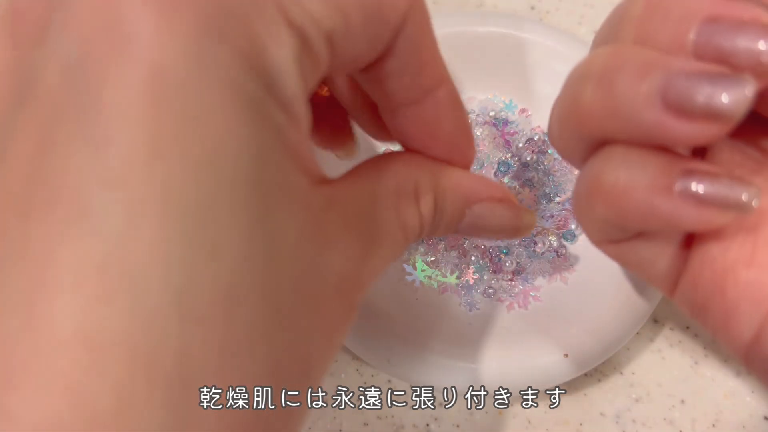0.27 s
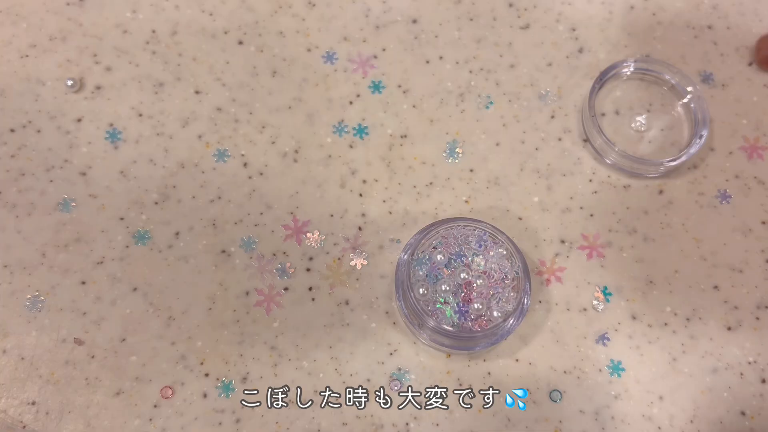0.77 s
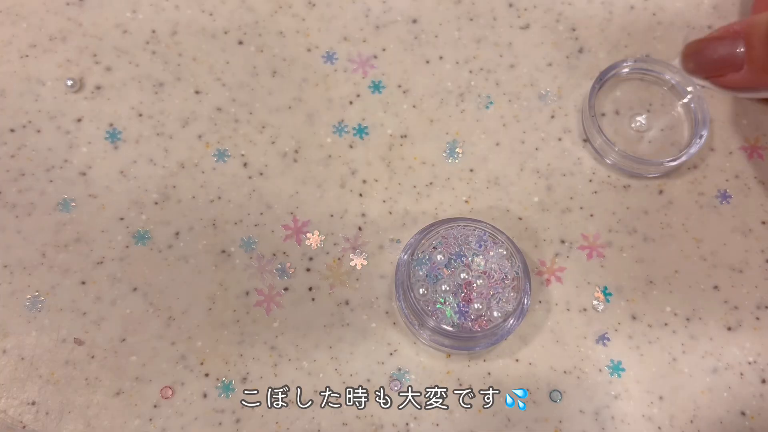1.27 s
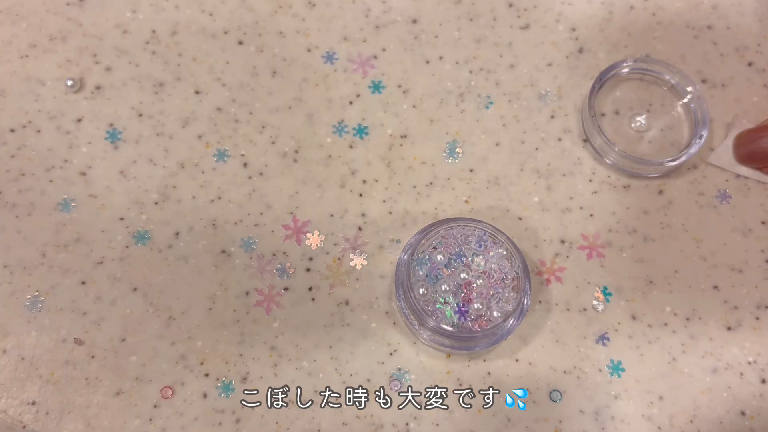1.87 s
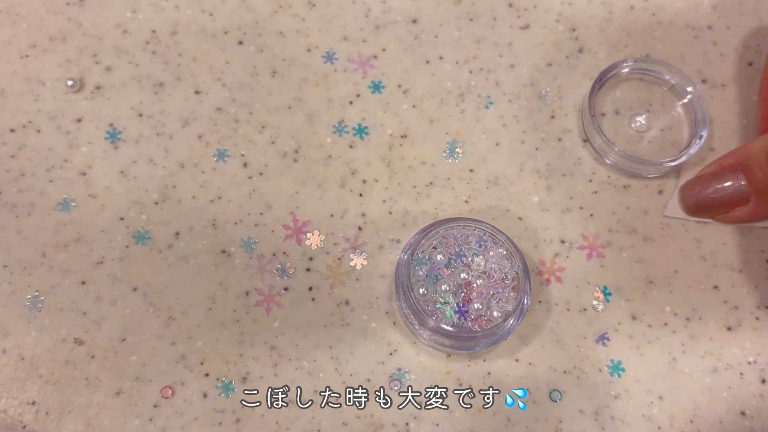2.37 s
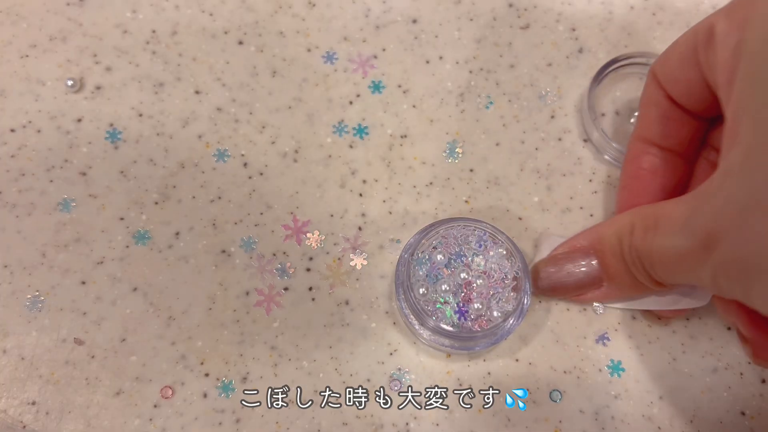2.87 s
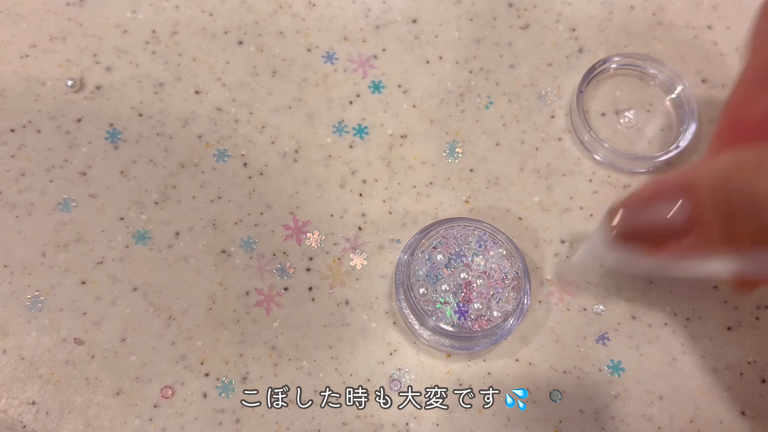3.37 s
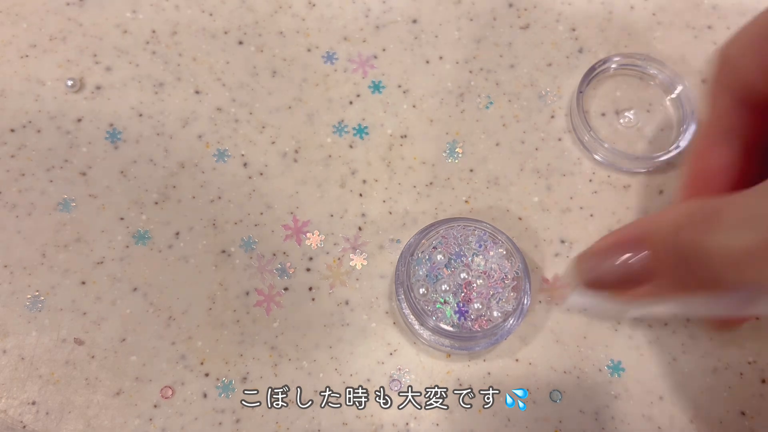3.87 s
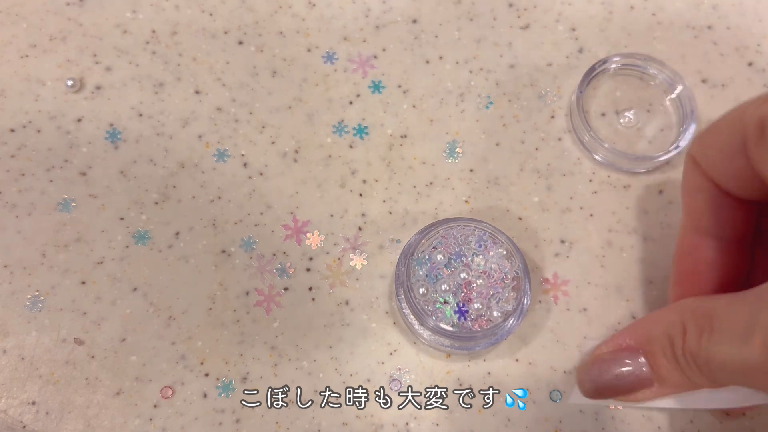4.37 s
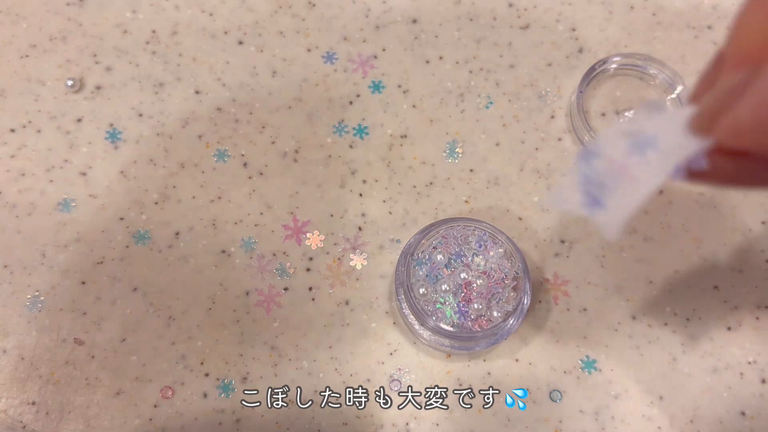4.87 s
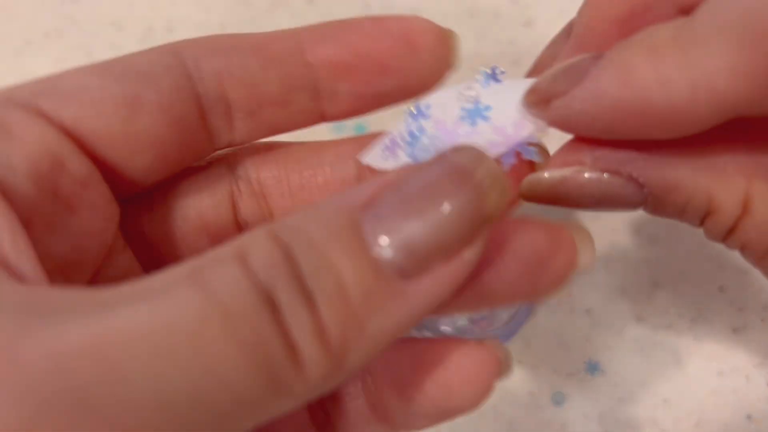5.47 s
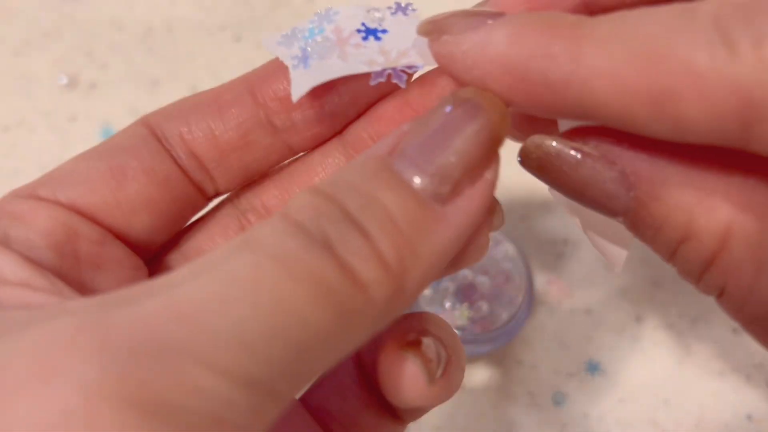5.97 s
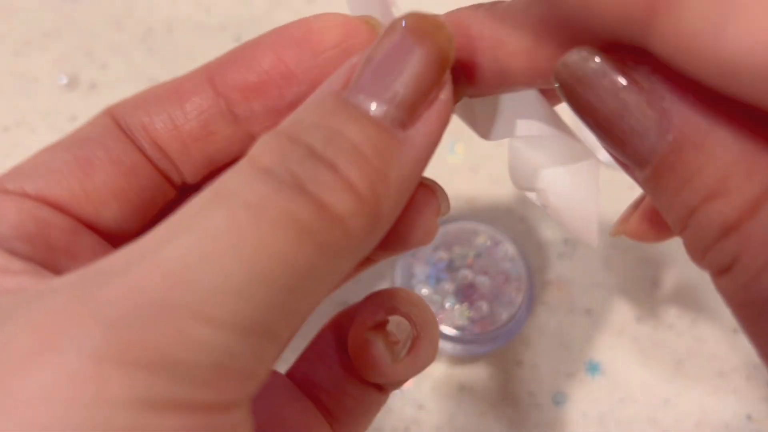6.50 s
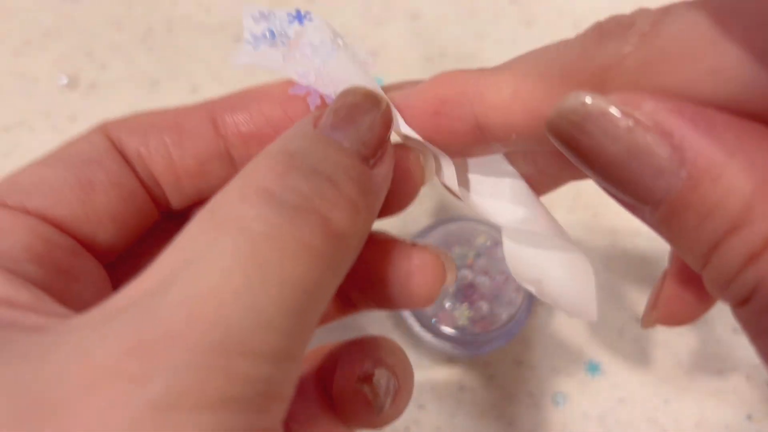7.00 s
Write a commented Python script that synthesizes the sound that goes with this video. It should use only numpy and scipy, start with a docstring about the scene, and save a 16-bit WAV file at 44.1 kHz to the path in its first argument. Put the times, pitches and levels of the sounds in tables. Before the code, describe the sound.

A quiet, dry indoor space with a soft low fan hum and faint room air throughout, picked up by a very close stereo microphone. Light skin and tape rustle opens; at 0.6 s a soft deep thump with bright ticks, then a strong crisp crackle at 0.8 s. Fingertip thumps with light knocks and sticky snaps follow at about 1.2, 1.75, 1.95 and 2.3 s, with small crackles at 1.5, 2.4 and 2.6 s. Another snap comes at 3.1 s, and the sharpest, brightest click with a knock at 3.6 s. Clicks at 3.85 and 4.4 s surround a soft thump near 4.2 s; short faint scrapes run from 4.45 to 4.7 s. Then it thins out: tiny ticks, a light tap at 5.6 s, crisp peeling snaps at 6.35 and 6.55 s, and a bright snap at 6.9 s over faint rustling.

```python
"""Fingers press a scrap of sticky tape on a hard counter to pick up spilled plastic sequins, then peel at it.
Tape and sequins snap in bursts of micro-slips and rustle as dense tiny slips through the tape's resonances.
Fingertips thump and nails knock the counter, ringing its modes; edges scrape along it.
A fan hums through duct resonances in quiet room air, all heard by two close microphone ports
a fraction of a millisecond apart."""
import sys
import numpy as np
from scipy import signal
from scipy.fft import rfft, irfft, next_fast_len
from scipy.io import wavfile
from scipy.ndimage import uniform_filter1d

SR = 44100
rng = np.random.default_rng(int(sys.argv[2]) if len(sys.argv) > 2 else 0)


def put_to_file(sound):
    """Save the sound as 16-bit audio at rate SR, in the file named by the first command-line argument."""
    columns = np.atleast_2d(sound).T  # one column per channel
    safe = np.clip(columns, -1, 1)
    whole_steps = np.round(safe * 32767)
    wavfile.write(sys.argv[1], SR, whole_steps.astype(np.int16))


N = 319284   # length in samples


def amp(db):
    """Turn dB into gain."""
    return 10 ** (np.asarray(db) / 20)


def rms_one(x):
    """Scale a sound to rms 1."""
    return x / np.sqrt(np.mean(x ** 2) + 1e-20)


def at_hz(points, hz):
    """Read a spectrum table on a log-frequency axis."""
    point_hz, values = np.array(points).T
    return np.interp(np.log(hz + 1), np.log(point_hz + 1), values)


def band(x, low_hz, high_hz, order=2):
    """Causal band-pass."""
    edges = [low_hz, min(high_hz, .45 * SR)]
    return signal.sosfilt(signal.butter(order, edges, "band", fs=SR, output="sos"), x)


def resonate(x, hz, width_hz):
    """Two-pole resonance; a narrower one rings longer."""
    r = np.exp(-np.pi * width_hz / SR)
    return signal.lfilter([1, 0, -1], [1, -2 * r * np.cos(2 * np.pi * hz / SR), r * r], x)


def ports(x):
    """One sound as both ports hear it: phase and level differ between them, less so for long waves."""
    # Difference between the ports. Each row: frequency in Hz, left port's phase lead in radians,
    # left minus right in dB; both differences shrink below 250 Hz.
    port_difference = [(0, -0.5, -1.5), (423, 0.86, 1.2), (860, -1.5, -2), (1400, -0.5, 1.5),
                       (2250, 1.1, 0), (2600, 2.4, -1.5), (3700, 1.4, -1.5), (5090, 1.6, -2),
                       (6120, 3.5, -0.5), (8135, 6.5, 0.5), (17730, 19.5, -0.5)]
    at, lead, tilt_db = np.transpose(port_difference)
    size = next_fast_len(N + 64)
    hz = np.arange(size // 2 + 1) * SR / size
    apart = np.clip(hz / 250, 0, 1)
    half_phase = .5 * apart * np.interp(hz, at, lead)
    half_gain = amp(.5 * apart * np.interp(hz, at, tilt_db))
    turn = np.exp(1j * half_phase) * half_gain
    spectrum = rfft(x, size)
    left = irfft(spectrum * turn, size)[:N]
    right = irfft(spectrum / turn, size)[:N]
    return np.array([left, right])


def hum():
    """The fan drives a few narrow duct resonances, steadier than free noise, and a thin hiss high up."""
    # Fan resonances. Each row: frequency in Hz, nominal width in Hz, rms level in dB.
    ducts = [(167.7, 10.6, -53), (186, 10.3, -63.5), (226.4, 31, -72.5), (287.6, 15, -68), (718, 19, -82.5),
             (6890, 330, -80.5)]
    steadiness = .25   # 0 free noise, 1 constant height
    rotor_hz, rotor_db = 28.7, -65.5   # the fan's turning, a steady low tone; rms level
    lead_in = 8192   # samples dropped while the resonances build up
    out = 0
    white = rng.standard_normal((len(ducts), next_fast_len(N + lead_in)))
    for noise, (hz, width_hz, level_db) in zip(white, ducts):
        stage_width_hz = width_hz * 1.36   # two passes narrow the resonance
        tone = resonate(resonate(noise, hz, stage_width_hz), hz, stage_width_hz)
        height = np.abs(signal.hilbert(tone)) + 1e-9
        evened = tone / height ** steadiness
        out = out + amp(level_db) * rms_one(evened[lead_in:lead_in + N])
    rotor = np.sqrt(2) * np.sin(2 * np.pi * rotor_hz * np.arange(N) / SR)
    return out + amp(rotor_db) * rotor


def room_air():
    """Steady room noise: a part both ports share and a part each has alone."""
    # Colour of the room air. Each row: frequency in Hz, relative density in dB per Hz.
    air_colour = [(15, -35.5), (28, -17.5), (40, -14.5), (75, -5), (120, -13.5), (200, -17), (345, -23),
                  (485, -21), (642, -31.5), (1080, -29), (1900, -40.5), (3400, -44.5), (5500, -56.5),
                  (9000, -74.5), (14000, -58.5), (16000, -94.5)]
    # Likeness of the room air at the two ports. Each row: frequency in Hz, shared share of power (0 to 1).
    likeness = [(15, .999), (110, 0.99), (170, 0.88), (350, .8), (700, 0.067), (1800, 0.61), (2800, 0.06),
                (4800, .2), (6000, 1), (17000, 1)]
    air_db = -56.5   # rms
    hz = np.arange(N // 2 + 1) * SR / N
    colour = amp(at_hz(air_colour, hz))
    alike = np.clip(at_hz(likeness, hz), 0, 1)
    white = rfft(rng.standard_normal((3, N)))
    shared = ports(irfft(white[0] * colour * np.sqrt(alike), N))
    alone = irfft(white[1:] * colour * np.sqrt(1 - alike), N)
    return amp(air_db) * rms_one(shared + alone)


def rubbing(hz):
    """Strength of all rubbing near one pitch: the fidgeting plus every rub, each swelling and fading."""
    # Uneven fidgeting of skin and sleeve beneath the rubs. Each row: time in seconds, level at 7500 Hz in dB.
    fidgeting = [(0.0, -69), (0.15, -84.5), (0.43, -83.5), (1.12, -72.5), (1.4, -82), (2.0, -77.5),
                 (2.175, -101), (2.35, -92), (2.85, -78), (3.0, -90), (3.467, -104), (3.68, -89),
                 (4.08, -102), (4.2, -70), (4.335, -83), (4.79, -77), (4.95, -79.5), (5.07, -74),
                 (5.54, -73.5), (5.68, -87), (6.15, -78.5), (6.21, -103), (6.43, -75), (6.75, -82.5),
                 (7.11, -71), (7.24, -77.5)]
    # Rubs of tape on skin and counter. Each row: peak in seconds, peak level at 7500 Hz in dB,
    # ms to swell 10 dB, ms to fade 10 dB, tilt in dB per octave.
    rubs = [(0.2, -72.5, 13, 39, 23.5), (0.644, -66.5, 22, 65, -1), (0.821, -42.5, 14, 10.5, 7),
            (0.85, -68.5, 63, 49, -3), (1.18, -66.5, 22, 50, -3.5), (1.332, -66, 40, 21, 2.5),
            (1.522, -59, 67, 28, 0), (1.656, -68, 39, 51, 1), (1.746, -61, 20, 36, -1),
            (1.948, -50.5, 14.5, 14.5, 2.5), (1.971, -69, 22, 52, 0), (2.276, -53, 4, 15, 3.5),
            (2.3, -66, 46, 46, 3), (2.434, -64.5, 26, 63, 1), (2.611, -62.5, 17, 31, -5),
            (2.749, -79, 25, 100, -1), (2.883, -68.5, 76, 55, 0.5), (3.106, -61, 12.5, 38, -1.5),
            (3.556, -61, 25.5, 31, 3.5), (3.609, -57.5, 9, 36, 0), (3.845, -70, 39, 16.5, 17),
            (4.111, -71, 28, 56, 15), (4.151, -62, 16, 43, 1.5), (4.37, -68, 24, 85, 2),
            (4.47, -63.5, 48, 94, -2.5), (4.645, -59.5, 75, 84, -1), (4.904, -69.5, 152, 32, -1),
            (5.592, -63, 35, 39, 1.5), (6.256, -68.5, 17, 60, 13), (6.357, -55.5, 30, 26, 2),
            (6.814, -62.5, 24, 5, -0.5), (6.929, -68, 33, 90, 1)]
    # softer fidgeting is duller: tilt in dB per octave for each dB below usual
    usual_db, tilt_per_db = -75.5, 0.641
    t = np.arange(0, N + 128, 128) / SR
    octaves = np.log2(hz / 7500)
    fidget_db = np.interp(t, *np.transpose(fidgeting))
    fidget_db = fidget_db + tilt_per_db * (fidget_db - usual_db) * octaves
    s, peak_db, swell_ms, fade_ms, tilt_db = np.transpose(rubs)[:, :, None]
    ms = 1000 * (t - s)
    drop_db = 10 * np.where(ms < 0, -ms / swell_ms, ms / fade_ms)
    rub_db = peak_db + tilt_db * octaves - drop_db
    power = amp(fidget_db) ** 2 + np.sum(amp(rub_db) ** 2, axis=0)
    return np.interp(np.arange(N) / SR, t, np.sqrt(power))


def rustle():
    """Dense tiny slips in clumps a few milliseconds long ring the tape; sequins tick faintly among them."""
    # Resonances of the taut tape and skin under rubbing. Each row: frequency in Hz, width in Hz, relative dB.
    tape = [(2420, 700, 3.5), (2950, 250, 0.5), (3870, 480, -1.5), (5130, 450, 0), (6020, 3500, 4),
            (7040, 1900, 0.5), (10000, 4600, 0), (11500, 2600, 4.5), (14400, 1200, -0.5)]
    grains_per_s, ticks_per_s = 9000, 260   # mean rates; dry ticks add a quarter as many again
    tick_db = -8.5   # dry ticks against the rubbing
    lowest_hz, highest_hz, sequin_width = 2500, 13300, 0.12   # sequin pitches; width as a share of pitch
    clumps = amp(1.9 * rms_one(band(rng.standard_normal(N), 18.0, 130)))
    sizes = amp(3.0 * np.minimum(rng.exponential(1, N), 4)) * rng.choice([-1, 1], N)
    grains = clumps * sizes * (rng.random(N) < grains_per_s / SR)
    dealt = rng.random((len(tape), N)) < .5   # each resonance gets about half of the grains
    out = 0
    for (hz, width_hz, own_db), mine in zip(tape, dealt):
        # contact shifts, each resonance flickers
        patch_db = 3.6 * rms_one(band(rng.standard_normal(N), 2.7, 27))
        ringing = rms_one(resonate(grains * mine, hz, width_hz))
        out = out + rubbing(hz) * amp(own_db - 12.5 + patch_db) * ringing
    # dry ticks
    dry_hits = sizes * (rng.random(N) < ticks_per_s / 4 / SR)
    ticks = resonate(dry_hits, 900, 1500) * rng.standard_normal(N)
    out = out + amp(tick_db) * rubbing(7500) * rms_one(band(ticks, 3000, 15000))
    # ringing ticks, each at one of six pitches
    born = sizes * (rng.random(N) < ticks_per_s / SR)
    pitch = rng.integers(0, 6, N)
    for k, hz in enumerate(np.geomspace(lowest_hz, highest_hz, num=6)):
        ticks = born * (pitch == k) + 1e-18
        ringing = rms_one(resonate(ticks, hz, sequin_width * hz))
        out = out + amp(tick_db - 16.5) * rubbing(hz) * ringing
    # low-pass: the rustle stops near 16 kHz
    return signal.sosfilt(signal.cheby2(12, 40, 16150, fs=SR, output="sos"), out)


def snaps():
    """Each snap is a burst of uneven micro-slips that swells and dies fast; the piece that snaps colours it."""
    # Clear snaps of tape, nails and sequins. Each row: start in seconds, dull, body, crisp, edge and top
    # peak levels in dB, rings included, low ring in Hz, high ring in Hz, nominal length in ms.
    snap_rows = [(0.4212, -78, -78, -72, -75, -59, 4930, 14800, 1.5),
                 (0.5061, -64, -70, -68, -68, -66, 2000, 7100, 0.9),
                 (0.6207, -71.5, -79.0, -70, -66.5, -44, 930, 12730, 0.9),
                 (0.6322, -56, -61, -47.5, -42, -37, 5300, 12830, 1.5),
                 (0.6338, -60, -60, -54, -43, -41, 9000, 12790, 0.96),
                 (0.6425, -56, -74.5, -65, -56, -50, 1060, 14400, 2.6),
                 (0.8078, -64, -53, -65, -62.0, -58.0, 2340, 14810, 3),
                 (0.8111, -48, -40.5, -35.5, -32.5, -49, 2320, 5500, 2.2),
                 (0.818, -47, -43, -58, -30.5, -48, 2300, 14690, 0.8),
                 (0.824, -36.5, -47, -37.5, -35.5, -32.5, 1600, 6550, 3.2),
                 (1.158, -69, -80, -66.0, -57.5, -60, 2350, 8890, 4.3),
                 (1.175, -51, -52, -55, -58, -65, 3300, 5300, 2.6),
                 (1.179, -48, -61, -56, -55.5, -56, 1060, 5000, 3),
                 (1.4805, -74, -76, -58, -50, -56, 2610, 13630, 2.9),
                 (1.5167, -60, -52, -41, -42.5, -37, 1940, 14880, 2.6),
                 (1.5238, -72, -67, -55, -51.5, -51, 1060, 11020, 2.7),
                 (1.661, -77, -77.5, -54.5, -51.5, -49.5, 930, 11500, 1.9),
                 (1.726, -62, -73.0, -50, -53, -53, 3450, 11780, 2.1),
                 (1.7328, -63, -75.0, -48.5, -51, -52, 1160, 5660, 1.6),
                 (1.7473, -46.5, -46.5, -37, -42.5, -34.5, 5200, 14500, 3.1),
                 (1.939, -58, -47, -39, -35, -35, 8300, 12900, 3.2),
                 (1.9478, -51.5, -67, -35, -40, -49, 1280, 5600, 1.55),
                 (1.9614, -62, -70.5, -48, -52, -50, 2220, 6120, 1.0),
                 (2.269, -64, -73, -51, -48, -41.5, 3010, 10720, 1.5),
                 (2.2771, -50.5, -57, -50.5, -54, -51, 1070, 5400, 6.8),
                 (2.423, -59, -55, -55, -43.5, -40.5, 2160, 15000, 4),
                 (2.434, -77, -76.0, -59.5, -47, -52, 2220, 11820, 1.1),
                 (2.471, -57, -47.5, -44.5, -55, -81.0, 3000, 4800, 1.9),
                 (2.601, -55, -44.5, -43.5, -45, -54, 2820, 5260, 4.4),
                 (2.6187, -72, -51, -58, -53, -69, 3170, 7760, 5.4),
                 (2.737, -66, -75, -56, -55, -55, 1310, 9500, 5.9),
                 (2.7546, -69, -68, -56, -59, -55.5, 2330, 11500, 5.7),
                 (3.1068, -57, -58, -40, -41, -34.5, 7200, 10600, 1.4),
                 (3.1161, -55.5, -53, -38, -43, -55, 3080, 4300, 1.8),
                 (3.494, -68, -81.0, -64.5, -63, -55, 1405, 12680, 2.1),
                 (3.5176, -74, -77, -63, -61, -56.5, 1080, 13070, 1.8),
                 (3.5487, -69, -63, -48, -45, -37.5, 7000, 13700, 2.8),
                 (3.6006, -54, -61, -51, -48, -34, 4600, 13000, 0.75),
                 (3.6046, -41.5, -42.5, -39.5, -30, -21.5, 9100, 13000, 0.9),
                 (3.656, -57, -63, -74, -63, -60, 1085, 11580, 3.6),
                 (3.858, -59, -45.5, -37, -46.5, -55, 2420, 4300, 0.99),
                 (4.097, -77, -78, -63, -60.5, -74.0, 970, 7750, 1.5),
                 (4.1268, -79, -65, -60, -52.5, -54, 3680, 6460, 4.1),
                 (4.153, -56.5, -60, -46, -46.5, -40.5, 7600, 11000, 3.2),
                 (4.399, -55, -45.5, -38, -49, -59, 2920, 4750, 2.0),
                 (4.477, -68, -56, -51, -48, -52, 4800, 8150, 6.1),
                 (4.556, -63, -60, -65, -68, -70, 2010, 4200, 2),
                 (4.642, -57, -66.5, -65.0, -49, -59, 2450, 8120, 1.3),
                 (4.704, -73.5, -62, -58.5, -62, -67.5, 3680, 4240, 2.3),
                 (4.725, -74, -57, -58, -58, -64.5, 2300, 9400, 1.9),
                 (4.789, -61, -58.5, -59.0, -63, -65.5, 5000, 8500, 1.2),
                 (4.855, -71, -59, -49.5, -49.5, -45, 7060, 9800, 1.5),
                 (4.895, -72.0, -62, -53, -45.5, -58, 3060, 9800, 1.8),
                 (5.081, -72, -64, -55.5, -59, -57, 2990, 13260, 1.7),
                 (5.587, -49, -47, -48, -53, -63.0, 2200, 6100, 1.4),
                 (5.595, -64, -69, -60, -49, -56, 2450, 8750, 2.9),
                 (5.7404, -57.5, -64, -64.5, -62.5, -65, 1060, 6450, 0.74),
                 (6.341, -73, -66, -60, -55, -49, 2990, 11630, 2.7),
                 (6.3452, -55, -43, -60, -43, -46.0, 2950, 8040, 1.1),
                 (6.3584, -45, -51.5, -40, -41.5, -37, 1330, 6050, 1.85),
                 (6.555, -59, -48, -53, -67, -65, 2930, 4970, 3.4),
                 (6.9193, -68, -42.5, -45, -36.5, -30, 2900, 7700, 0.92)]
    # Bounds in Hz of the dull, body, crisp, edge and top bands.
    edges_hz = (600, 1800, 3800, 6300, 10300, 16200)
    ring_db, ring_width, least_width_hz = 6, .11, 450   # against the band's crack; width as a share of pitch
    rise = .5   # exponent; small: a snap starts abruptly
    tail_db, tail_t60_s = -19, 0.04   # against the burst
    size = 2048
    out, t = np.zeros((2, N + size)), np.arange(size) / SR
    draws = rng.standard_normal((len(snap_rows), 2, size))
    places = .6 * rng.uniform(-1.6, 1, len(snap_rows))   # sideways lean of each snap
    for row, (noise, lumps), place in zip(snap_rows, draws, places):
        s, *levels_db, low_ring_hz, high_ring_hz, length_ms = row
        age = t / (max(length_ms - .6, .15) / 1000)
        burst = noise * age ** rise * np.exp(-1.7 * age + .5 * lumps)
        # nearby surfaces
        burst_rms = np.sqrt(np.mean(burst[age < 1] ** 2))
        tail = lumps * amp(tail_db - 60 * t / tail_t60_s) * burst_rms
        # the counter mirrors the snap a fraction of a millisecond later
        lag = round((0.5 + 0.37 * place) * SR / 1000)
        burst[lag:] += amp(-17.5) * burst[:-lag].copy()
        sound = 0
        for low_hz, high_hz, level_db in zip(edges_hz, edges_hz[1:], levels_db):
            crack = rms_one(band(burst + tail, low_hz, high_hz, order=3))
            for ring_hz in (low_ring_hz, high_ring_hz):
                if low_hz <= ring_hz < high_hz:
                    width_hz = max(ring_width * ring_hz, least_width_hz)
                    crack = crack + amp(ring_db) * rms_one(resonate(crack, ring_hz, width_hz))
            loudest = np.sqrt(uniform_filter1d(crack ** 2, size=32).max())
            sound = sound + amp(level_db) * crack / loudest
        out[:, round(s * SR):][:, :size] += [sound, place * sound]
    return out[:, :N]


def knocks():
    """A knock strikes every counter mode with its own strength; the slab spreads it, the low part arrives last."""
    # Nail knocks on the counter. Each row: start in seconds, relative level in dB,
    # hardness in dB per octave above 500 Hz.
    knock_rows = np.array([(0.6369, -46, 1.5), (0.823, -50.5, 9), (1.1751, -42.5, -3.5),
                           (1.7461, -45, -3.5), (1.9385, -50, -3), (2.2789, -49, 3), (3.6036, -39, 5),
                           (5.5515, -50, 0), (5.5845, -62, 9)])
    # Counter modes. Each row: frequency in Hz, relative level in dB, time to fall 60 dB in seconds.
    modes = [(290, 9.5, 0.044), (398.5, 5, 0.084), (485, 4, 0.15), (590, 7, 0.033), (727, -0.5, 0.063),
             (967, -1, 0.059), (1352, -3.5, 0.02), (2075, -10, 0.016)]
    travel_ms = 2.4   # a 500 Hz bending wave needs this long to arrive; higher ones are faster
    s, knock_db, hardness_db = knock_rows.T
    starts = np.round(s * SR).astype(int)
    out = np.zeros(N)
    luck_db = rng.normal(0, 1.5, (len(knock_rows), len(modes)))
    for (hz, level_db, t60), own_db in zip(modes, luck_db.T):
        clicks = np.zeros(N) + 1e-18
        clicks[starts] = amp(knock_db + hardness_db * np.log2(hz / 500) + level_db + own_db - 9.0)
        r, w = amp(-60 / (t60 * SR)), 2 * np.pi * hz / SR
        out += signal.lfilter([0, np.sin(w)], [1, -2 * r * np.cos(w), r * r], clicks)
    hz = np.arange(N // 2 + 1) * SR / N
    travel = np.exp(-4j * np.pi * travel_ms / 1000 * np.sqrt(500 * hz))
    return irfft(rfft(out) * travel, N)


def thumps():
    """Bending waves in the slab spread out: the high part comes first, the pitch sinks to a last deep swing."""
    # Fingertip thumps travelling through the counter. Each row: time of fullest swell in seconds,
    # swell level in dB, pitch at that time in Hz, share of cycles lost per ms (up to 25 ms), lead-in in ms.
    thump_rows = [(0.66, -31, 66, 0.0032, 4.7), (1.198, -29, 78.6, 0.0088, 13),
                  (1.763, -41, 80, 0.0028, 15), (1.96, -41, 76.4, 0.027, 18), (2.299, -30, 77, 0.0073, 7.2),
                  (3.116, -45, 88, 0.0055, 5.1), (3.586, -37, 66.6, 0.0027, 9.4),
                  (4.185, -37.5, 64.7, 0.0037, 7.2)]
    size = 4800
    out = np.zeros(N)
    for s, level_db, hz, fall, lead_ms in thump_rows:
        first = round((s - .05) * SR)
        ms = 1000 * (np.arange(first, first + size) / SR - s)
        cycles = hz * (ms - fall * ms * np.minimum(ms, 25)) / 1000
        swell = np.exp(-(ms / np.where(ms < 0, lead_ms, 14.0)) ** 2)
        out[first:first + size] -= amp(level_db) * swell * np.sin(2 * np.pi * cycles)
    return out


def scrapes():
    """An edge drags over the grain of the counter: uneven slips into one resonance, swelling and fading."""
    # Short scrapes of tape edge and nail on the counter. Each row: start in seconds, end in seconds,
    # frequency in Hz, width in Hz, level in dB.
    scrape_rows = [(1.393, 1.515, 7200, 1200, -67), (2.475, 2.598, 5400, 1600, -67),
                   (2.81, 2.855, 9900, 350, -75), (4.442, 4.47, 8300, 2500, -67),
                   (4.503, 4.535, 4800, 5000, -63.5), (4.5, 4.725, 2400, 210, -68),
                   (4.565, 4.7, 4100, 660, -63), (4.56, 4.694, 9600, 1800, -62.5)]
    slips_per_s, longest = 3000, 12288   # mean rate; longest scrape in samples
    out = np.zeros(N)
    shape = (len(scrape_rows), longest)
    draws = rng.standard_normal(shape) * (rng.random(shape) < slips_per_s / SR)
    for (start, end, hz, width_hz, level_db), noise in zip(scrape_rows, draws):
        size = min(round((end - start) * SR), longest)
        slips = noise[:size] * np.abs(noise[:size]) ** 0.46   # widens the spread of slip sizes
        swell = np.hanning(size) ** 0.16
        out[round(start * SR):][:size] += amp(level_db) * swell * rms_one(resonate(slips, hz, width_hz))
    return out


def scene():
    """Everything near the ports, over the room air; the hand shades the upper middle of each snap to one side."""
    snap, lean = snaps()
    near = ports(snap + thumps() + knocks() + rustle() + scrapes() + hum())
    shading = ports(band(lean, 1500, 3100)) * [[1], [-1]]   # opposite sign at the two ports
    return near + shading + room_air()


def record(dry):
    """Low-pass the whole sound: it fades above about 16 kHz and stops by 17.4 kHz."""
    soft = signal.sosfilt(signal.butter(12, 16600, fs=SR, output="sos"), dry)
    return signal.sosfilt(signal.cheby2(12, 70, 17400, fs=SR, output="sos"), soft)


dry = scene()
out = record(dry)
put_to_file(out)
```